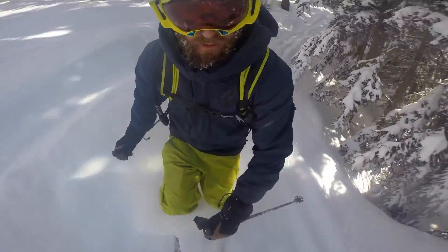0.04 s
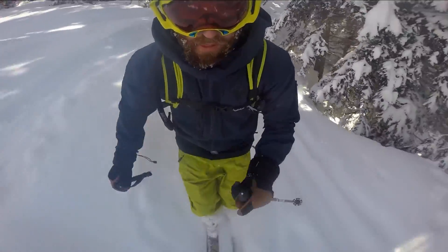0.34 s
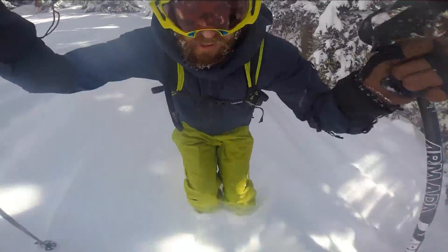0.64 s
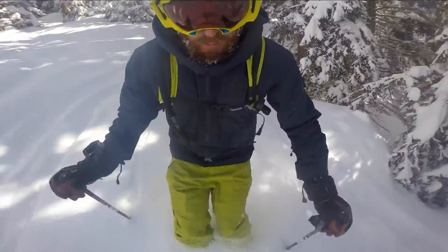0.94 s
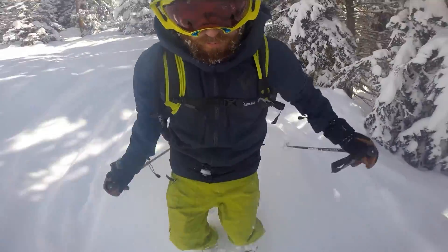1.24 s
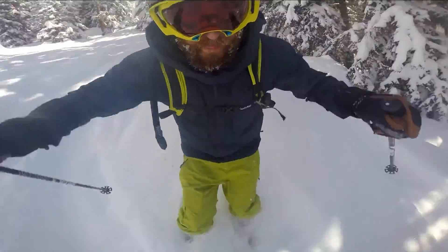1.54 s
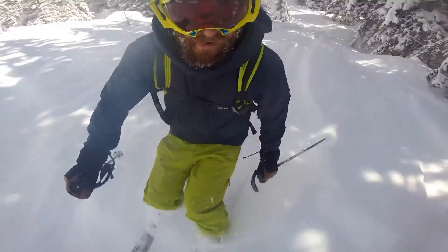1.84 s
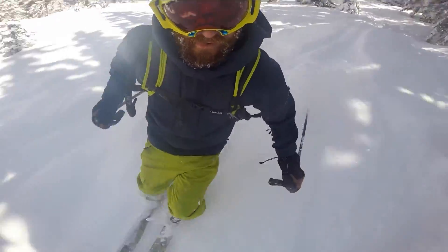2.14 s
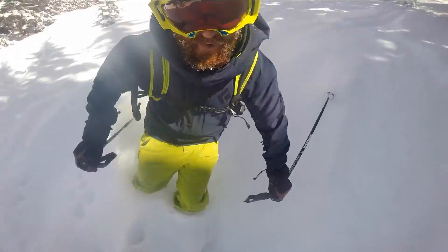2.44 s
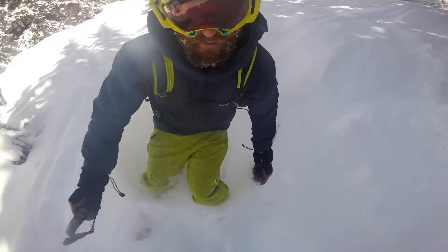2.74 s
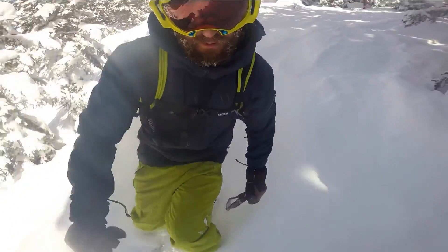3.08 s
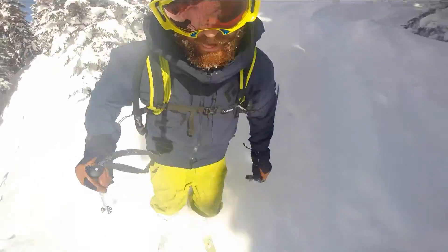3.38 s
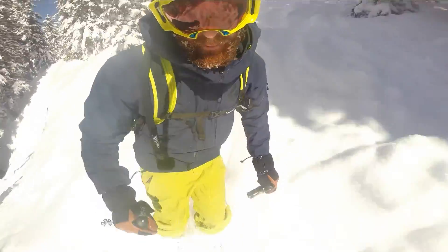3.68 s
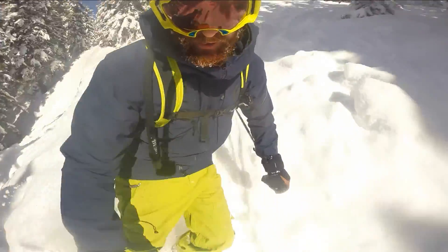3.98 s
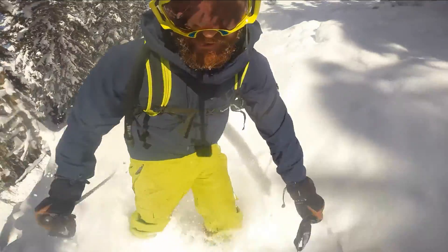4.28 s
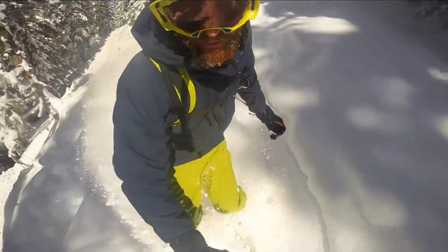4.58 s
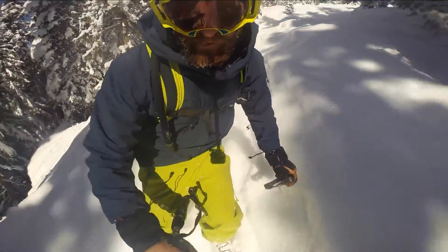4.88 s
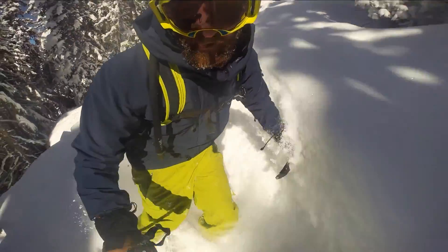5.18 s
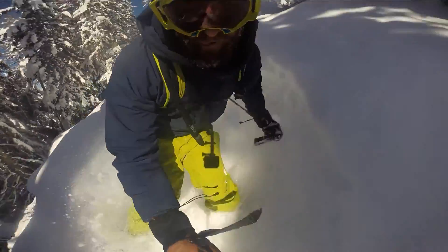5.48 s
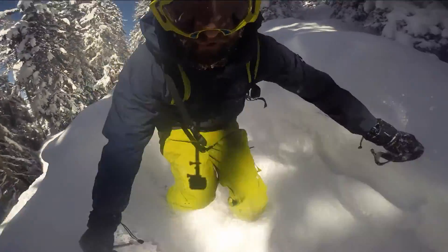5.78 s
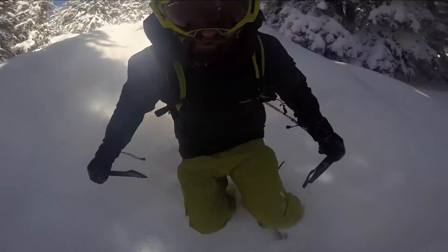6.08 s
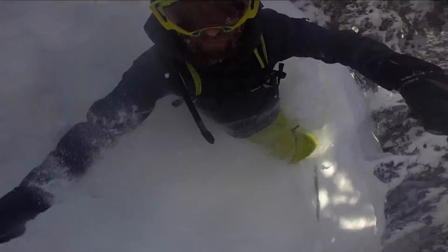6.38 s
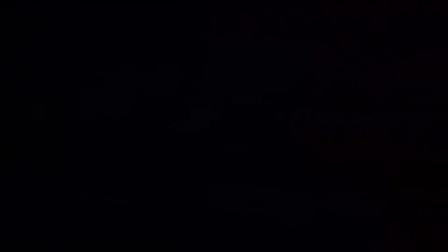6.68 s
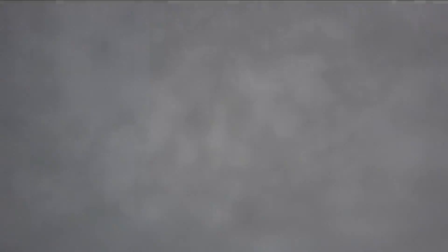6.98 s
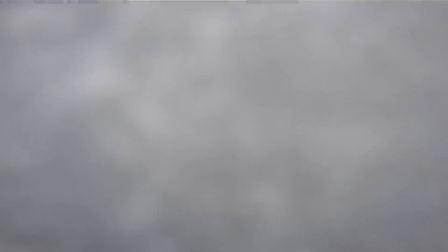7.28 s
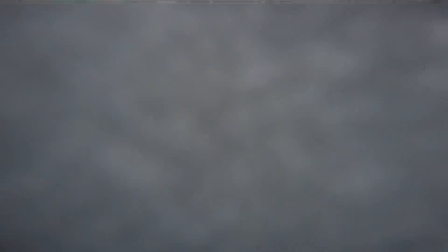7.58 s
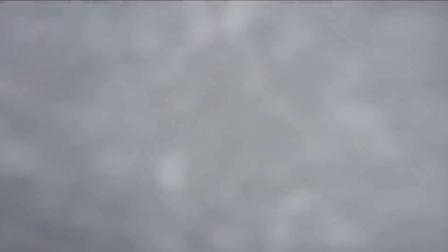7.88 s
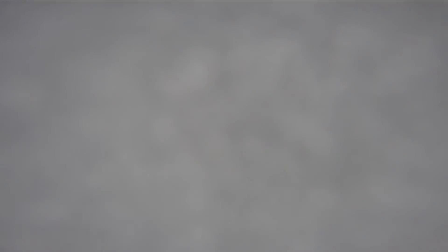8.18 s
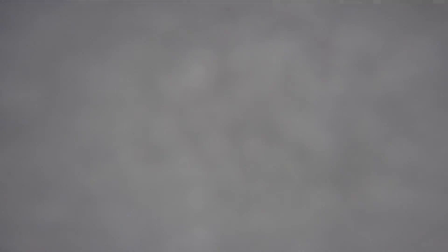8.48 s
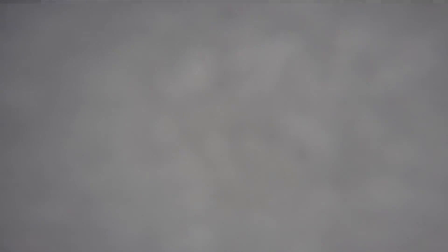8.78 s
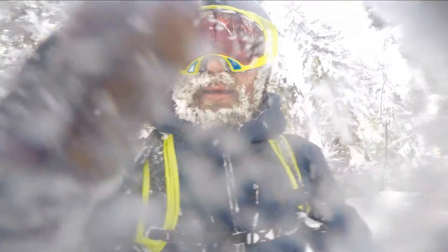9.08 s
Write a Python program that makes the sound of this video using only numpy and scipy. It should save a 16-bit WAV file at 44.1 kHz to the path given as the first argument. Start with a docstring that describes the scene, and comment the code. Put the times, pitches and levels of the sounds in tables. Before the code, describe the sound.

For the first six and a half seconds, skis hiss softly through deep powder, swelling and dipping with the turns. Air rumbles on the pole-held microphone, with faint jacket swishes, pattering snow crumbs and small gear ticks. The pole's loose joint gives sharp, briefly ringing clacks at about 0.8, 1.1, 1.6, 2.4, 4 and 5.5 seconds, with soft thuds between them. Around 6.5 seconds the skier falls: a quick clatter leads into a very loud slam and low rumble at 6.7 seconds as the microphone hits the snow. Close, lumpy crunches grind over it until about 8 seconds. It then lies buried, with only a faint hiss and rumble. At 8.7 seconds a loud knock sets the pole shuddering as it is pulled out, and snow scrapes off the housing over handling rumble, with another thud and a small crackle just after 9 seconds.

```python
"""A skier runs through deep powder with a camera on a pole. The snow hisses under the skis in each turn,
air buffets the microphone, the jacket swishes, gear ticks, and a loose joint clacks and rings the pole.
After about six and a half seconds the skier falls: the camera slams into the snow and crunches through it.
It lies buried for a moment, with little more than a faint background hiss and rumble to hear.
Near nine seconds it is pulled out, and snow scrapes off its housing and crackles."""
import sys
import numpy as np
from scipy import signal
from scipy.fft import rfft, irfft, next_fast_len
from scipy.io import wavfile
from scipy.ndimage import uniform_filter1d, minimum_filter1d, map_coordinates

SR = 44100
rng = np.random.default_rng(int(sys.argv[2]) if len(sys.argv) > 2 else 0)


def waveform_to_disk(signal):
    """Save audio, clipped to [-1, 1], as 16-bit WAV at the path in sys.argv[1]."""
    frames = np.transpose(np.atleast_2d(signal))
    scaled = np.clip(frames, -1, 1) * 32767
    samples = np.round(scaled).astype(np.int16)
    wavfile.write(sys.argv[1], SR, samples)


N = 407078

TOP_HZ = 15700  # the camera cuts off sound above this pitch
# The tones at which pole and housing ring, the slow bending one first.
# Each row: pitch in Hz, level in dB, seconds to fade by 60 dB.
POLE_TONES = [(62.55, -7, 0.26), (232.5, 0.5, 0.075), (360, -16.5, 0.096), (534.5, -8.5, 0.11),
              (710, -0.5, 0.02), (1105, -6.5, 0.049), (1260, -9, .065), (1550, 6, 0.022),
              (1838, -23.5, 0.2), (2239, 8.5, 0.037), (2580, -6.5, 0.033)]
# The bright fizz in crunching snow and small clicks. Each row: frequency in Hz, relative level in dB.
FIZZ_SPECTRUM = [(2500, -12), (4800, -0.5), (6000, 2), (7400, -4.5), (12000, -10.5), (15500, -22.5)]


def skis(crumbs_db=7.5, spray_db=-18, spray_grows=0.18, background_db=-58.5, dip_width_s=0.041):
    """Powder hisses under the skis in each turn, over a background hiss; crumbs and spray fly too."""
    # The skis dig in. Each row: peak time in seconds, rise and fall in seconds, hiss level in dB.
    turns = [(.69, 0.56, 0.79, -51.5), (1.549, 0.12, 0.57, -55), (2.351, 0.13, 0.45, -53.5),
             (2.952, 0.49, 0.36, -53.5), (3.898, 2.5, 0.69, -53), (5.2, 0.99, 1, -49.5), (6.5, 1.8, 1, -48)]
    # The skis go light between turns and the hiss dips. Each row: time in seconds, change in dB.
    lifts = [(.1, -5), (1.19, -10.5), (2.2, -5.5), (4.74, -3.5)]
    # The tone colours of powder and of fine spray. Each row: frequency in Hz, relative level in dB.
    powder_spectrum = [(240, -26), (400, -3.5), (700, -2.5), (1000, -5.5), (1740, -0.5), (2950, -3),
                       (3340, 0.5), (4010, -7), (5930, -5), (6940, -16.5), (11700, -58.5)]
    spray_spectrum = [(5000, -16.5), (11000, 1), (16000, -21.5)]
    t = np.arange(N) / SR
    clumps = amp(2.4 * wobble(34))
    digging = clumps * swells(*np.transpose(turns))
    lift_db = sum(db * bell_curve(t, when, dip_width_s) for when, db in lifts)
    # A faint steady background hiss is always there, even when the camera lies buried.
    level = amp(lift_db) * np.hypot(digging, amp(background_db))
    grains = snow_grains(powder_spectrum, per_second=900, snap_gain=0.83)
    spray_gain = amp(spray_db) * unit(level) ** spray_grows  # hard turns throw more spray
    spray = spray_gain * snow_grains(spray_spectrum, per_second=200, snap_gain=0.4)
    return level * (grains + amp(crumbs_db) * crumbs() + spray)


def clacks(crack_fade_s=0.0025, edge_db=-29, kick_db=4):
    """The loose joint chatters against its stop and kicks the camera; pole and housing ring on."""
    # Hard contacts in the joint. Each row: start in seconds, chatter level in dB, chatter pitch in Hz,
    # crack level in dB, top of the crack in Hz, level of kick and ring in dB.
    contacts = [(0.8253, 17, 2230, 2.5, 7700, -7.5), (1.078, -3, 1960, -7, 6000, -9),
                (1.084, -0.5, 2230, -4, 4500, -11), (1.6354, 15.5, 2203, 4, 6800, -5),
                (1.6625, -27.5, 2290, -21, 5510, -24), (2.391, 3, 2245, 5, 5800, -12.5),
                (4.0482, 14.5, 2264, -3.5, 7600, -9), (4.1146, -33, 2250, -48, 3000, -26.5),
                (5.506, 8, 2204, 0, 5200, -8.5), (6.254, -16.5, 2290, -18.5, 14000, -31.5),
                (6.5518, 17.5, 2175, 4.5, 7300, -8.5), (6.6028, 7.5, 2230, -7, 5500, -5.5),
                (6.6154, 2, 2130, -1.5, 6500, -18), (6.6515, -7, 2380, -8.5, 6000, -23),
                (8.743, -6, 2195, -4.5, 4500, -39)]
    # The tone colour of the crack. Each row: frequency in Hz, relative level in dB.
    crack_spectrum = [(200, -1.5), (2000, 10.5), (5000, 1), (15000, -12.5)]
    out, t = np.zeros(N), np.arange(SR // 3) / SR
    touch = bell_curve(t, middle=0.0029, width=0.00079)
    kick = amp(kick_db) * push(t, peak_s=0.0012)
    grit = noise(crack_spectrum)
    for start, chatter_db, hz, crack_db, top_hz, ring_db in contacts:
        drift = 0.041 * np.cumsum(rng.standard_normal(len(t)))  # the chatter is not a pure tone
        chatter = amp(chatter_db) * touch * np.sin(2 * np.pi * hz * t + drift)
        edge = burst(grit, t, crack_fade_s)
        low_pass = signal.butter(10, min(top_hz, TOP_HZ), fs=SR, output="sos")
        crack = signal.sosfilt(low_pass, edge) + amp(edge_db) * edge
        ring = pole_ring(t, dull_above_hz=7040, attack_s=0.00089)
        add(out, start, chatter + amp(crack_db) * crack + amp(ring_db) * (kick + ring))
    return out


def jolts(ring_db=-6, grip_s=0.05):
    """Soft blows through the arm give a dull push and a thud, and set the pole bending to and fro."""
    # The soft blows. Each row: start in seconds, level of push and thud in dB, bending level in dB.
    blows = [(0.992, -22.5, -48), (1.086, -17, -6), (1.422, -30, -40.5), (1.949, -29, -27),
             (2.106, -29, -27.5), (2.291, -29, -32.5), (2.54, -18.5, -25.5), (4.015, -21, -19),
             (5.76, -19, -20.5), (5.989, -29, -17), (6.122, -18.5, -16.5), (6.361, -17.5, -16),
             (6.49, -13, -10), (6.638, 4.5, -17), (6.705, 9.5, -20), (8.743, 1.5, 1.5), (9.039, -12, -6),
             (9.067, -2.5, -19)]
    out, t = np.zeros(N), np.arange(SR // 2) / SR
    bend_hz, _, bend_fade_s = POLE_TONES[0]
    bending = np.sin(2 * np.pi * bend_hz * t) * amp(-60 * t / bend_fade_s)
    for start, db, bend_db in blows:
        ring = pole_ring(t, dull_above_hz=586, attack_s=0.0012)
        thud = amp(ring_db) * ring * np.exp(-t / grip_s)  # the grip damps the ring
        add(out, start, amp(db) * (thud - push(t, peak_s=0.0015)) + amp(bend_db) * bending)
    return out


def pole_ring(t, dull_above_hz, attack_s, detune=0.023, rattle=0.32):
    """Pole and housing ring a little differently at each blow; a soft blow misses the high tones."""
    hz, db, fade_s = np.transpose(POLE_TONES)[:, :, None]
    strength = amp(db + 2 * rng.standard_normal(db.shape)) / (1 + (hz / dull_above_hz) ** 2)
    hz = hz * (1 + detune * rng.uniform(-0.83, 1, hz.shape))
    looseness = uniform_filter1d(rng.standard_normal((len(hz), len(t))), size=100, axis=1)
    slip = rattle * np.cumsum(looseness, axis=1) / np.sqrt(fade_s * SR)  # the joint roughens each tone
    waves = np.sin(2 * np.pi * (hz * t + slip + rng.random(hz.shape)))
    tones = strength * amp(-60 * t / fade_s) * waves
    return tones.sum(0) * (1 - np.exp(-t / attack_s))


def crash():
    """The camera slams into the snow, which gives way and packs in short, thick crunches."""
    # The slams. Each row: start in seconds, level in dB, fade time in seconds.
    slams = [(6.638, -12, 0.0028), (6.697, 10, 0.0049)]
    # The tone colour of snow being packed. Each row: frequency in Hz, relative level in dB.
    packing_spectrum = [(300, 7.5), (730, 3), (1100, -0.5), (2400, 3.5), (4000, -10.5), (15500, -22.5)]
    out, t = np.zeros(N), np.arange(SR // 10) / SR
    packing = noise(packing_spectrum)
    for start, db, fade_s in slams:
        add(out, start, amp(db) * burst(packing, t, fade_s))
    return out


def ploughing(stop_s=0.0039):
    """Snow grinds over the moving camera in lumpy shoves, then scrapes off it on the way out."""
    # The housing shoves through snow.
    # Each row: peak time in seconds, rise and fall in seconds, crunch level in dB, fizz level in dB.
    shoves = [(6.755, 0.093, 0.11, -16.5, -24), (6.923, 0.074, 0.073, -9.5, -14.5),
              (6.999, 0.052, 0.023, -15.5, -20.5), (7.07, 0.11, 0.21, -36, -38),
              (7.214, 0.071, 0.037, -18, -24), (7.315, 0.12, 0.077, -29.5, -37.5),
              (7.495, 0.029, 0.027, -7.5, -9.5), (7.524, 0.07, 0.3, -11.5, -20),
              (7.626, 0.12, 0.066, -15.5, -22.5), (7.751, 0.076, 0.14, -11, -22),
              (7.839, 0.1126, 0.1, -17, -29), (8.031, 0.29, .4, -41, -37.5),
              (8.774, 0.088, 0.014, -26, -36)]
    # The camera moves against the snow only in these spans. Each row: start and end in seconds.
    drags = [(6.66, 8.044), (8.75, 9.143), (9.178, 9.3)]
    # Snow slides off. Each row: peak time in seconds, rise and fall in seconds, level in dB.
    slides = [(8.841, 0.0027, 0.026, -5.5), (8.895, 0.011, 0.082, -7), (8.989, 0.056, 0.15, -20),
              (9.222, 0.075, 0.11, -27.5)]
    # The tone colours of crunching snow and of sliding snow that makes the housing ring.
    # Each row: frequency in Hz, relative level in dB.
    crunch_spectrum = [(90, -2.5), (220, -3.5), (320, -11), (700, -13.5), (1750, -0.5), (2340, 2.5),
                       (2900, -3.5), (3900, -6), (5000, -22), (9000, -49.5)]
    scrape_spectrum = [(500, -8), (1250, -15), (1850, -7), (2150, 5), (2600, -3), (3400, -2), (4500, -9),
                       (5700, 0), (7000, -13), (15500, -32)]
    t = np.arange(N) / SR
    peak, rise, fall, crunch_db, fizz_db = np.transpose(shoves)
    moving = sum(np.clip(np.minimum(t - start, end - t) / stop_s, 0, 1) for start, end in drags)
    lumps = amp(1.2 * wobble(54) + 1.34 * wobble(260))
    crunch = snow_grains(crunch_spectrum, per_second=3000, snap_gain=0.77)
    crunch *= swells(peak, rise, fall, crunch_db)
    fizz = snow_grains(FIZZ_SPECTRUM, per_second=4700, snap_gain=0.6)
    fizz *= swells(peak, rise, fall, fizz_db)
    scrape = snow_grains(scrape_spectrum, per_second=2300, snap_gain=0.63)
    scrape *= swells(*np.transpose(slides))
    return moving * lumps * (crunch + fizz + scrape)


def snow_grains(spectrum, per_second, snap_gain):
    """Snow grains break: tiny snaps of uneven size over the blur of countless smaller ones."""
    sizes = amp(5 * np.minimum(rng.exponential(size=N), 3)) * rng.choice([-1, 1], N)
    snaps = unit(sizes * (rng.random(N) < per_second / SR))
    return coloured(snap_gain * snaps + rng.standard_normal(N), spectrum)


def buffeting(shudder_db=-30, shudder_grows=0.66):
    """Air rumbles on the microphone in the turns, handling after the fall; the pole shudders too."""
    # How strong the rumble is. Each row: time in seconds, level in dB.
    rumble_levels = [(.3, -41.5), (.72, -26.5), (1.25, -41.5), (1.6, -34), (2, -42.5), (2.35, -31.5),
                     (2.7, -32), (3.45, -29.5), (3.62, -33.5), (4, -25), (4.7, -36.5), (5.35, -30),
                     (5.7, -31.5), (6.45, -19), (6.8, -10.5), (7.12, -31.5), (7.4, -38), (7.52, -25.5),
                     (7.85, -34.5), (8.1, -43), (8.68, -43.5), (8.86, -16.5), (9.05, -18.5), (9.17, -28.5)]
    # The tone colours of rumble and shudder. Each row: frequency in Hz, relative level in dB.
    rumble_spectrum = [(25, 9.5), (44, 2), (61, 1.5), (80, -9), (130, -20), (1300, -93)]
    shudder_spectrum = [(70, -5.5), (230, 2.5), (310, -9), (540, -19.5), (4500, -82)]
    times, db = np.transpose(rumble_levels)
    level = amp(np.interp(np.arange(N) / SR, times, db))
    shudder = level ** shudder_grows * amp(shudder_db + 5 * wobble(24)) * noise(shudder_spectrum)
    return level * noise(rumble_spectrum) + shudder


def jacket_swishes(width_s=0.081, relative_band=0.17):
    """Jacket and sleeve fabric swishes swell and fade, each in its own band of hiss."""
    # The fabric rubs. Each row: peak time in seconds, level in dB, middle of the band in Hz.
    rubs = [(0.651, -53, 4010), (1.379, -60.5, 4030), (2.039, -64, 5100), (3.19, -55, 3620),
            (5.19, -47, 5900), (5.24, -48, 3110)]
    out, t = np.zeros(N), np.arange(SR // 2) / SR
    middle, sharpness = t[-1] / 2, 1 / relative_band
    for peak, db, hz in rubs:
        hiss = signal.lfilter(*signal.iirpeak(hz, sharpness, SR), rng.standard_normal(len(t)))
        hiss = signal.lfilter(*signal.iirpeak(hz, sharpness / 2, SR), hiss)
        add(out, peak - middle, amp(db) * unit(hiss) * bell_curve(t, middle, width_s))
    return out


def crumbs(count=240, middle_hz=3900, size_spread=3.5):
    """Crumbs of snow patter on the jacket, each with its own pitch and size."""
    out = np.zeros(N)
    for when, smallness, tone in rng.random((count, 3)):
        db = -size_spread * np.log(smallness + 0.027)
        hz = middle_hz * 2 ** (2 * tone - 1)  # up to an octave either way
        add(out, when * N / SR, amp(db) * tick(hz, cycles=2.9))
    return out


def dry_ticks(middle_hz=3400, click_db=4, click_fade_s=0.00093):
    """Gear taps while skiing and snow crackles at the end; each is a click and a few short rings."""
    # The small dry ticks. Each row: start in seconds, level in dB.
    ticks = [(.177, -47), (0.29, -42.5), (.545, -43.5), (1.459, -44), (3.286, -46), (4.8073, -39.5),
             (5.224, -37), (5.309, -35.5), (5.4508, -37), (6.061, -38), (9.221, -27.5)]
    out, t = np.zeros(N), np.arange(SR // 50) / SR
    grit = noise(FIZZ_SPECTRUM)
    for start, db in ticks:
        octaves = rng.uniform(-1.075, 1, size=5)
        rings = sum(tick(middle_hz * 2 ** octave, cycles=3.5) for octave in octaves)
        click = amp(click_db) * burst(grit, t, click_fade_s)
        add(out, start, amp(db) * (rings + click))
    return out


def electronics(whine_hz=11719, whine_db=-85, hiss_db=-77):
    """The camera's own circuits add a thin whine over an even hiss."""
    whine = amp(whine_db) * np.sin(2 * np.pi * whine_hz * np.arange(N) / SR)
    return whine + amp(hiss_db) * rng.standard_normal(N)


def tick(hz, cycles):
    """A tiny ring that dies away within a few vibrations."""
    t = np.arange(SR // 50) / SR
    return np.sin(2 * np.pi * hz * t) * np.exp(-t * hz / cycles) * (1 - np.exp(-2 * t * hz))


def burst(source, t, fade_s, attack_s=0.00096):
    """A random piece of a noise that starts fast and dies away."""
    piece = np.roll(source, rng.integers(N))[:len(t)]
    return piece * (1 - np.exp(-(t / attack_s) ** 2)) * np.exp(-t / fade_s)


def push(t, peak_s):
    """One smooth shove of pressure."""
    return (t / peak_s * np.exp(1 - t / peak_s)) ** 2


def swells(peak, rise, fall, db):
    """The gain of overlapping swells; each climbs 20 dB during its rise and sinks 20 dB in its fall."""
    t = np.linspace(0, N / SR, 8192)[:, None]
    each = amp(db - 20 * np.maximum((peak - t) / rise, (t - peak) / fall))
    return np.interp(np.arange(N) / SR, t[:, 0], np.linalg.norm(each, axis=1))


def bell_curve(t, middle, width):
    """A smooth hump of height 1; middle and width are in seconds."""
    return np.exp(-.5 * ((t - middle) / width) ** 2)


def wobble(per_second):
    """A smooth curve through this many random points a second."""
    points = rng.standard_normal(int(N * per_second / SR) + 4)
    return map_coordinates(points, [np.arange(N) * per_second / SR])


def noise(spectrum):
    """Steady noise with the given tone colour."""
    return coloured(rng.standard_normal(N), spectrum)


def coloured(x, spectrum):
    """Give x the tone colour drawn by (Hz, dB) points, at an average strength of 1."""
    size = next_fast_len(N + 8192)
    hz, db = np.transpose(spectrum)
    gain = amp(np.interp(np.log(np.fft.rfftfreq(size, 1 / SR) + 1), np.log(hz), db))
    return unit(irfft(rfft(x, size) * gain, size)[:N])


def unit(x):
    """Scale to an average strength (rms) of 1."""
    return x / np.sqrt(np.mean(x ** 2) + 1e-20)


def amp(db):
    """Turn decibels into a gain to multiply by."""
    return 10 ** (np.asarray(db) / 20)


def add(track, start_s, sound):
    """Mix a sound into the track at the given time."""
    part = track[max(round(start_s * SR), 0):][:len(sound)]
    part += sound[:len(part)]


def scene():
    """Everything as heard at the end of the pole, in one channel."""
    movement = skis() + jacket_swishes() + dry_ticks() + buffeting()
    fall = crash() + ploughing()
    pole = clacks() + jolts()
    return (movement + fall + pole + electronics())[None]


def record(dry, threshold_db=-6, recover_s=0.48, squeeze=0.59, hardness=4, round_off_db=1.9):
    """The camera turns down just before loud blows, recovers slowly, clips peaks and cuts the top."""
    over_db = np.maximum(20 * np.log10(np.abs(dry[0]) + 1e-9) - threshold_db, 0)
    ahead_db = -minimum_filter1d(-over_db, size=1300)  # the biggest overshoot nearby
    fade = np.exp(-np.arange(N) / SR / recover_s)
    held_db = uniform_filter1d(np.maximum.accumulate(ahead_db / fade) * fade, size=128)
    turned_down = dry * amp(-squeeze * held_db)
    rounded = turned_down / (1 + np.abs(turned_down / amp(round_off_db)) ** hardness) ** (1 / hardness)
    clipped = np.clip(rounded, -1, 1)
    size = next_fast_len(N + 8192)
    low_pass = 1 / (1 + (np.fft.rfftfreq(size, 1 / SR) / TOP_HZ) ** 200)
    return irfft(rfft(clipped, size) * low_pass, size)[:, :N]


dry = scene()
out = record(dry)
waveform_to_disk(out)
```